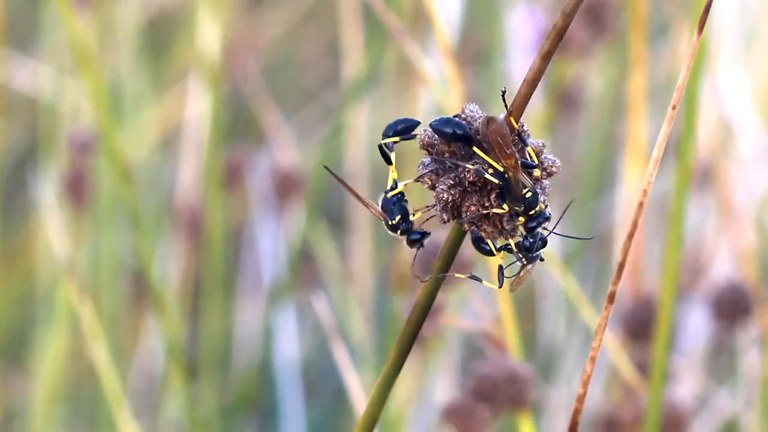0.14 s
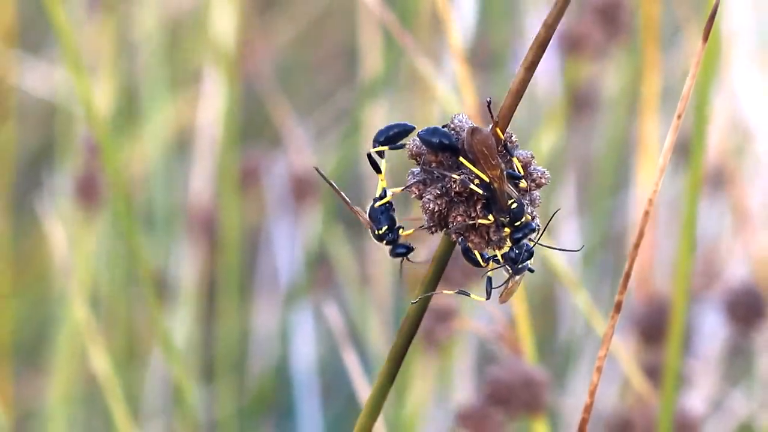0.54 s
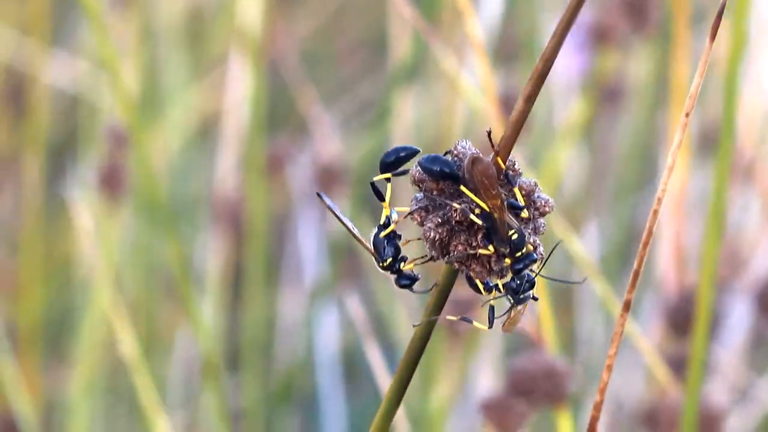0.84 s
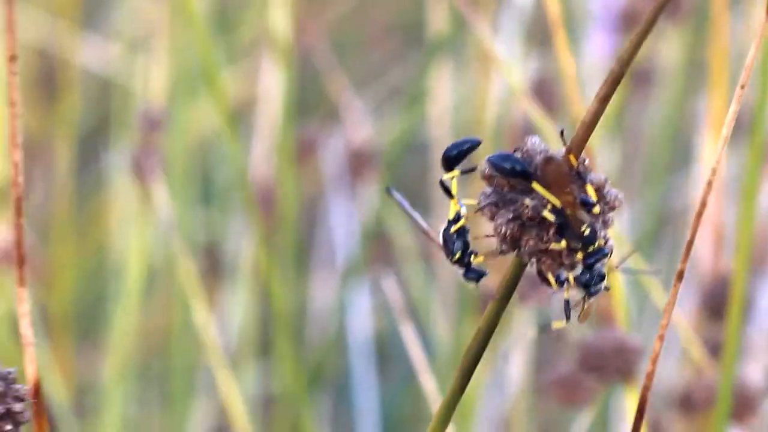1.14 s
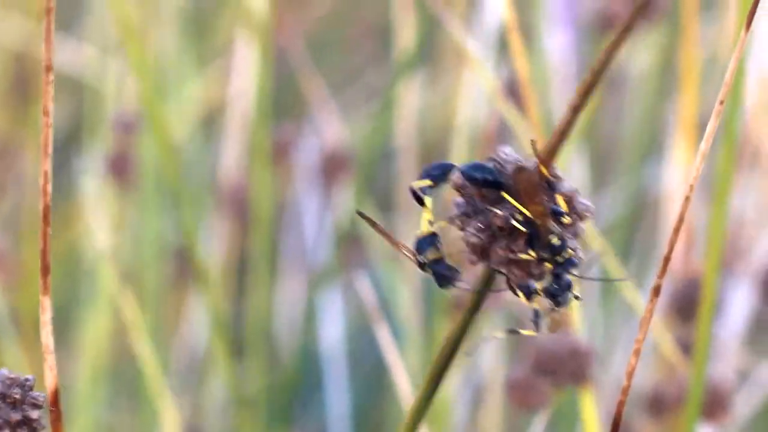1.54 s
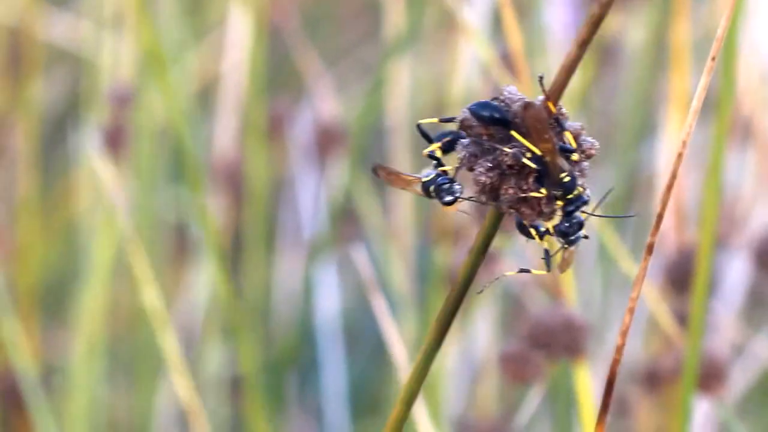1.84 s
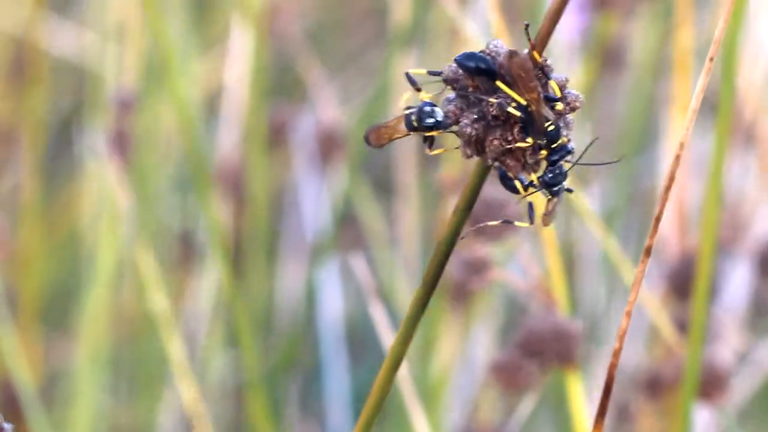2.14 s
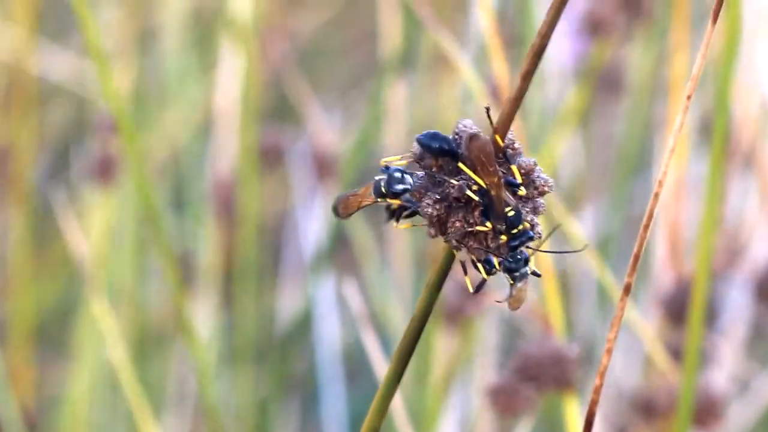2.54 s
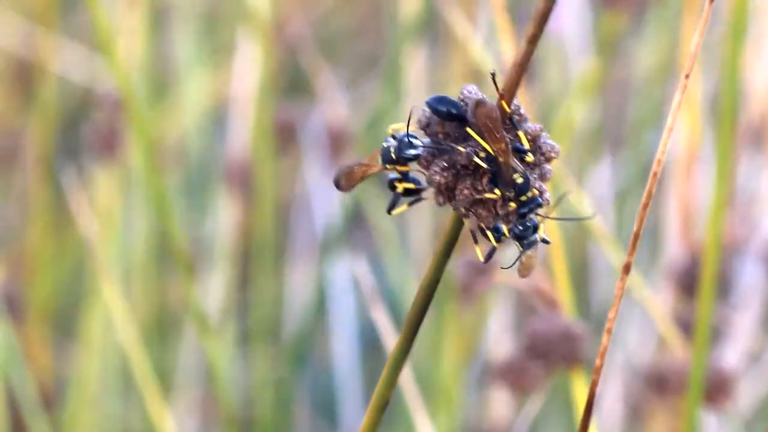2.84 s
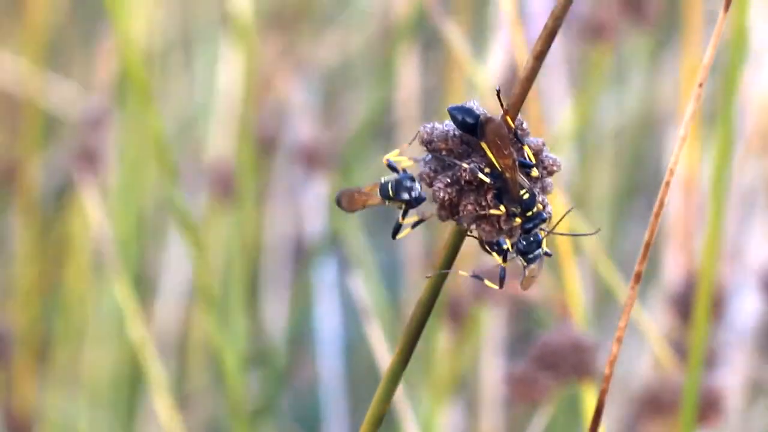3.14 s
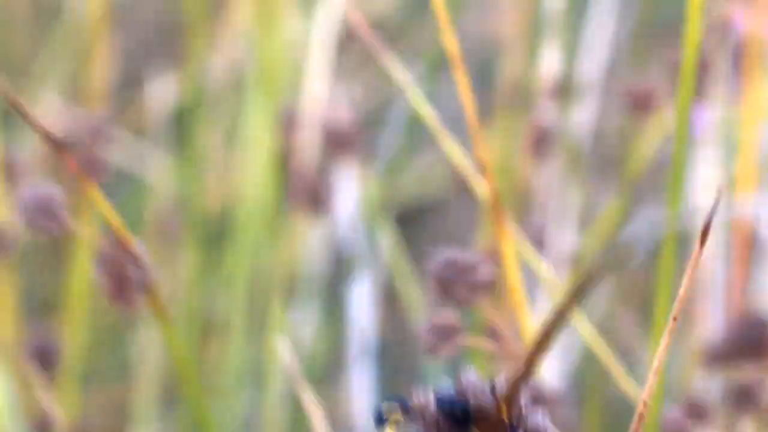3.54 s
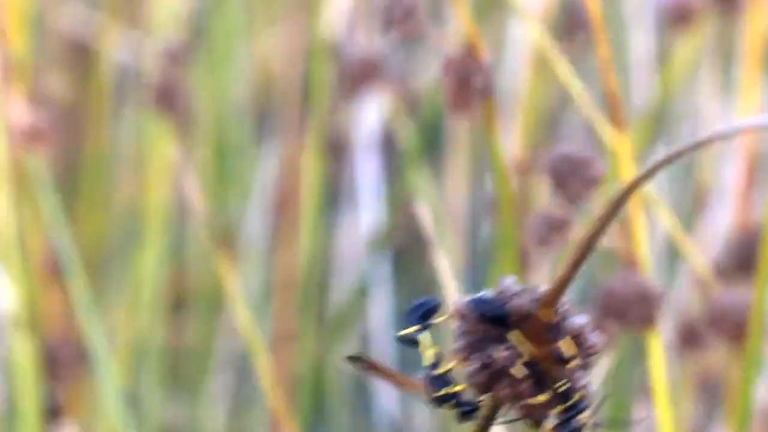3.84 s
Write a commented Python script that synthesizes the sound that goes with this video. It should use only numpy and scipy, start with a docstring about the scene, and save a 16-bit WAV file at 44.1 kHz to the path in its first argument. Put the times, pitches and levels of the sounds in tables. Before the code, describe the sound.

Wind buffets the microphone in low, uneven gusts over a quiet steady hiss of reeds outdoors; faint stem swishes, then a dull handling thump near the end and one more gust. Close, single-channel sound.

```python
"""A stand of reeds in light wind, heard from among the stems: a wide hiss of shaped noise.
Now and then stems swish softly, as short swells of grainy noise in one band.
Gusts buffet the microphone in low, lumpy noise that brightens as they grow; strong eddies pop as single swings.
Near the end the camera is jogged: one dull thump, a single low push, with a short knock of dead bursts."""
import sys
import numpy as np
from scipy import signal
from scipy.fft import rfft, irfft
from scipy.io import wavfile
from scipy.ndimage import uniform_filter1d

SR = 44100
rng = np.random.default_rng(int(sys.argv[2]) if len(sys.argv) > 2 else 0)


def transcribe(signal):
    """Save signal, clipped to [-1, 1], as a 16-bit WAV file at the path in sys.argv[1]."""
    frames = np.atleast_2d(signal).T
    limited = np.clip(frames, -1, 1)
    pcm = np.round(limited * 32767).astype(np.int16)
    wavfile.write(sys.argv[1], SR, pcm)


N = 176400
TIME = np.arange(N) / SR  # seconds


def amp(db):
    """Decibels to gain."""
    return 10 ** (np.asarray(db) / 20)


def unit(x):
    """Scales to an rms of one."""
    return x / np.sqrt(np.mean(x ** 2) + 1e-20)


def bell(x):
    """Smooth hump of height one; x counts standard deviations."""
    return np.exp(-x ** 2 / 2)


def read_spectrum(points, hz):
    """Reads a spectrum table on a log-frequency axis, in dB."""
    point_hz, point_db = np.transpose(points)
    return np.interp(np.log(hz + 1), np.log(point_hz + 1), point_db)


def read_curve(points, seconds, **outside):
    """Reads a level curve at the given times, in dB."""
    return np.interp(seconds, *np.transpose(points), **outside)


def white():
    """White noise, the raw material of wind and friction."""
    return rng.standard_normal(N)


# Shape of the steady wind in the reeds: frequency_hz, relative_level_db (per Hz)
HISS_SPECTRUM = [(12, -40), (25, -13), (45, -1), (68, 0), (110, -4.5), (190, -1), (290, -2.5), (380, -4),
                 (480, -2.5), (640, -8), (740, -9.5), (880, -11.5), (1200, -8.5), (1700, -9.5),
                 (2150, -9.5), (2550, -12), (3100, -11.5), (4500, -15.5), (7100, -20.5), (8200, -23),
                 (11000, -24.5), (14300, -24), (16000, -29)]
# Drift of the hiss treble: time_s, level_change_db
TREBLE_DRIFT = [(0, -1.2), (.3, -1), (.8, -0.1), (1.2, 1.3), (1.9, -0.9), (2.6, 1.4), (2.9, 0.4),
                (3.6, -0.3), (4, 1)]
HISS_DB, TREBLE_HZ = -45.5, 2500  # rms of the whole hiss; middle of the treble slope
PATCH_DB, SWELL_DB = 0.73, 0.1  # rms depths


def reeds():
    """Countless stems add up to a wide hiss, with faint drifting patches and a slow swell."""
    hz, frame_s, noise = signal.stft(white(), SR, nperseg=1024, noverlap=768)
    patches = uniform_filter1d(rng.standard_normal(noise.shape), size=14, axis=0)  # across frequency
    patches = unit(uniform_filter1d(patches, size=16, axis=1))  # across time
    swell = unit(uniform_filter1d(rng.standard_normal(len(frame_s)), size=30))
    treble_share = hz ** 2 / (hz ** 2 + TREBLE_HZ ** 2)
    treble = np.outer(treble_share, read_curve(TREBLE_DRIFT, frame_s))
    level = read_spectrum(HISS_SPECTRUM, hz)[:, None] + PATCH_DB * patches + SWELL_DB * swell + treble
    hiss = signal.istft(noise * amp(level), nperseg=1024, noverlap=768)[1][:N]
    return amp(HISS_DB) * unit(hiss)


# Stems brushing past each other: middle_s, half_length_s, level_db, centre_hz, width_octaves
STEM_SWISHES = [(0.305, .04, -54.5, 3800, 0.7), (1.002, 0.0064, -51, 4570, .1),
                (1.032, 0.011, -48, 3400, .15), (1.071, .007, -54, 4260, .14),
                (2.66, 0.054, -57.5, 4360, 0.22), (2.63, .06, -65, 12500, .25),
                (3.06, .015, -57, 14000, .25), (3.253, .003, -41.5, 1590, 0.59),
                (3.5, .008, -47, 4200, 0.15), (3.59, .05, -48.5, 3000, 0.43), (3.81, .035, -59, 13500, .3)]
SWISH_GRAIN = 0.28  # unevenness of the friction, as rms of the log gain


def swishes():
    """Stems rub past each other: each swish is a soft swell of fine friction grains in one band."""
    hz = np.fft.rfftfreq(N, 1 / SR) + 1  # +1 keeps the logarithm finite
    out = np.zeros(N)
    for middle, half_length, level_db, centre_hz, width in STEM_SWISHES:
        roughness = unit(uniform_filter1d(white(), size=60))
        grains = white() * np.exp(SWISH_GRAIN * roughness)
        band_shape = bell(np.log2(hz / centre_hz) / width)
        rub = unit(irfft(rfft(grains) * band_shape, N))
        out += amp(level_db) * bell((TIME - middle) / half_length) * rub
    return out


# Gusts on the microphone, one curve each: time_s, gust_db (before ceiling, flutter and trim)
GUST_CURVES = [
    [(0.42, -51), (0.456, -52), (0.476, -43), (0.51, -53), (0.54, -50)],
    [(0.98, -61), (0.99, -59), (1.006, -34.5), (1.036, -56), (1.058, -38.5), (1.184, -48), (1.212, -41),
     (1.24, -65), (1.25, -51)],
    [(1.25, -65), (1.274, -37), (1.484, -37), (1.502, -35), (1.526, -21), (1.586, -48.5), (1.62, -37.5),
     (1.658, -69), (1.68, -52)],
    [(1.76, -54), (1.77, -59), (1.782, -43), (1.798, -33), (1.828, -35), (1.85, -60), (1.86, -43)],
    [(2.6, -59), (2.628, -40), (2.696, -65), (2.758, -32), (2.812, -27), (2.836, -44), (2.874, -27.5),
     (2.99, -32.5), (3.1, -57)],
    [(3.22, -65), (3.24, -44), (3.262, -40), (3.306, -49), (3.324, -54), (3.33, -55)],
    [(3.74, -48), (3.764, -54), (3.798, -14.5), (3.828, -15.5), (3.904, -38.5), (3.934, -37), (3.956, -52),
     (3.978, -38), (4.0, -35.5)],
]
# The gust around the jog of the camera: time_s, gust_db (likewise)
JOG_GUST_CURVE = [(3.41, -50), (3.432, -33), (3.46, -25), (3.505, -27), (3.56, -33), (3.6, -11.5),
                  (3.63, -39), (3.66, -53), (3.74, -45)]
# Shape of the buffeting for a gust at REFERENCE_DB: frequency_hz, relative_level_db (per Hz)
BUFFET_SPECTRUM = [(10, -33), (30, -9), (70, 0), (120, 1), (225, -10), (380, -22.5), (550, -32.5),
                   (800, -50), (1500, -87)]
REFERENCE_DB, BUFFET_TRIM_DB = -27.5, -2
BRIGHTEN, PIVOT_HZ = 0.35, 136  # dB per gust dB per octave away from the pivot
CEILING_DB, CEILING_SLOPE = -35, 0.46  # above the ceiling the rumble grows by only this share
FLUTTER_DB, FLUTTER_HZ = 2.5, 35  # greatest swing; spread of the flutter rates
STEADINESS = 0.89  # share of the noise's own level wander that is evened out


def buffeting():
    """Fluttering turbulence at the microphone: stronger gusts are brighter, with growth eased above a ceiling."""
    curves = list(GUST_CURVES) + [JOG_GUST_CURVE]
    gust = np.max([read_curve(curve, TIME, left=-90, right=-90) for curve in curves], axis=0)
    hz = np.fft.rfftfreq(N, 1 / SR)
    flutter = unit(irfft(rfft(white()) * bell(hz / FLUTTER_HZ), N))
    eased = gust - (1 - CEILING_SLOPE) * np.maximum(gust - CEILING_DB, 0)
    level = eased + FLUTTER_DB * np.tanh(flutter)

    eddies = irfft(rfft(white()) * amp(read_spectrum(BUFFET_SPECTRUM, hz)), N)
    power = signal.fftconvolve(eddies ** 2, np.hanning(1324), "same")  # 30 ms window
    spectrum = rfft(unit(eddies / np.abs(power) ** (STEADINESS / 2)))

    octave = np.clip(np.log2((hz + 1) / PIVOT_HZ), -2, 3)
    excess = np.maximum(gust - REFERENCE_DB, -10)
    out = np.zeros(N)
    for k in range(-2, 4):  # overlapping octave bands that sum to the whole
        band = irfft(spectrum * np.maximum(1 - abs(octave - k), 0), N)
        out += band * amp(level + BRIGHTEN * k * excess)
    return amp(BUFFET_TRIM_DB) * out


# Single eddies patting the microphone: middle_s, level_db (peaks come out about 1 dB lower), swing_hz
EDDY_POPS = [(1.055, -34, 159), (1.168, -39, 159), (1.21, -36, 85), (1.279, -33, 130), (1.326, -31, 170),
             (1.344, -27, 135), (1.399, -25.5, 89), (1.464, -27, 169), (1.5012, -17, 230),
             (1.504, -22, 109), (1.517, -13, 115), (1.5245, -23.5, 370), (1.5258, -15.5, 139),
             (1.536, -21, 120), (1.553, -33, 150), (1.794, -24, 192), (2.754, -26.5, 65), (2.775, -27, 85),
             (2.7866, -29.5, 199), (2.809, -26.5, 150), (2.873, -24.5, 70), (2.891, -22.5, 147),
             (2.911, -22, 120), (2.943, -25, 119), (2.969, -26.5, 150), (2.983, -26, 160),
             (3.003, -31.5, 190), (3.433, -25.5, 149), (3.458, -19.5, 90), (3.4857, -22, 91),
             (3.5215, -21, 159), (3.5385, -25, 220), (3.553, -23, 71.6), (3.5877, -13, 190),
             (3.598, -19, 170), (3.802, -17.5, 135), (3.828, -19.5, 165), (3.857, -30, 230),
             (3.866, -27.5, 121), (3.986, -27.5, 70)]
POP_SPREAD = 0.25  # standard deviation of the pop's hump, in cycles


def pops():
    """Each passing eddy swings the pressure up and then down, for about one cycle."""
    out = np.zeros(N)
    for middle, level_db, swing_hz in EDDY_POPS:
        cycles = swing_hz * (TIME - middle)
        swing = np.sin(2 * np.pi * cycles) * bell(cycles / POP_SPREAD)
        out -= amp(level_db) * swing / bell(1 / 4 / POP_SPREAD) ** 0.5
    return out


# Knocks of the camera body: middle_s, peak_db, centre_hz, half_length_s
BODY_KNOCKS = [(3.472, -18, 746, 0.0011), (3.4778, -14, 1000, 0.00048), (3.4766, -13, 440, 0.0014)]
THUMP_S, THUMP_DB, THUMP_HZ = 3.475, -5, 123  # middle, peak and centre of the low push


def handling():
    """The camera is jogged: a low push swings down and up, and the body gives dead knocks that do not ring."""
    u = 2 * np.pi * THUMP_HZ * (TIME - THUMP_S)
    out = amp(THUMP_DB) * u * bell(u) * np.exp(0.5)  # exp(0.5) brings the peak to THUMP_DB
    for middle, peak_db, centre_hz, half_length in BODY_KNOCKS:
        t = TIME - middle
        out += amp(peak_db) * bell(t / half_length) * np.cos(2 * np.pi * centre_hz * t)
    return out


def scene():
    """Reeds all around; wind and handling right at the microphone, in one channel."""
    return (reeds() + swishes() + buffeting() + pops() + handling())[None]


def record(dry):
    """The recorder's band limit: a steep low-pass at 15.9 kHz."""
    lowpass = signal.firwin(801, 15900, window=("kaiser", 9), fs=SR)
    return signal.oaconvolve(dry, lowpass[None], "same")


dry = scene()
out = record(dry)
transcribe(out)
```